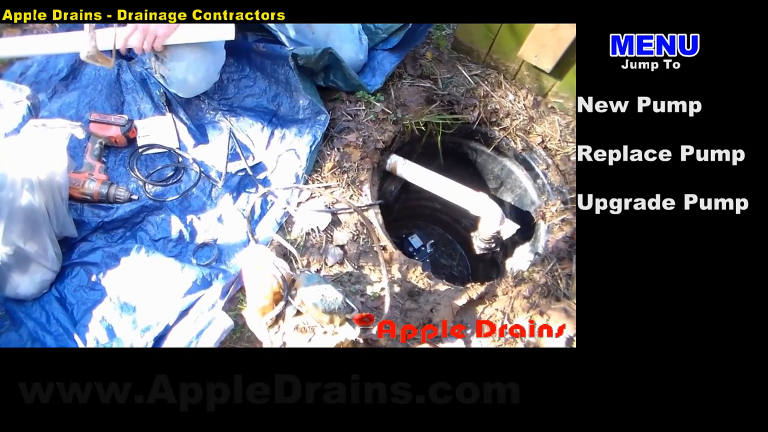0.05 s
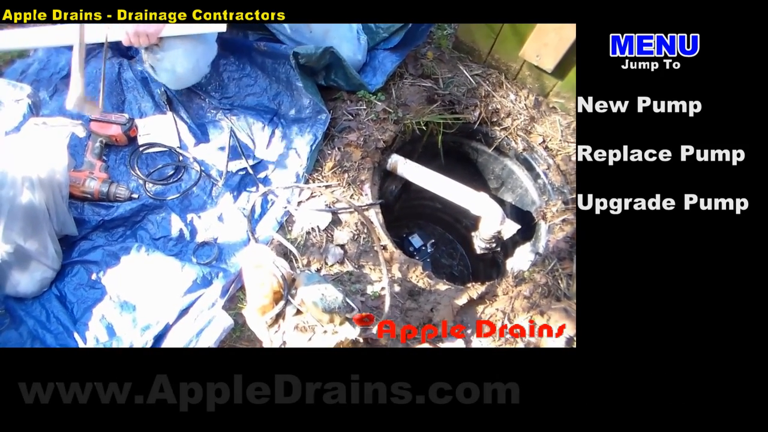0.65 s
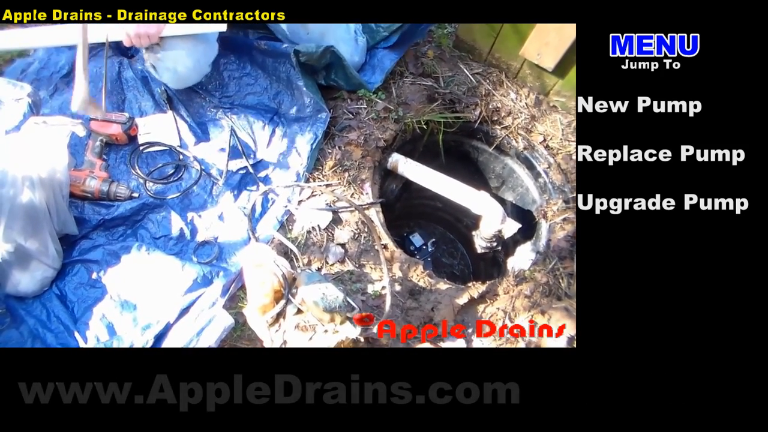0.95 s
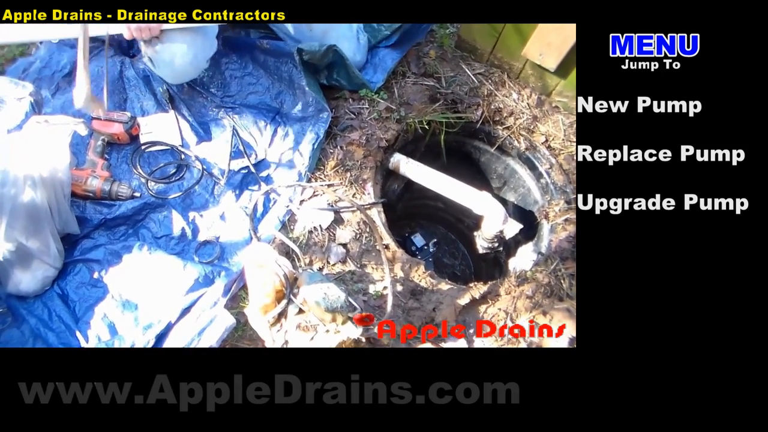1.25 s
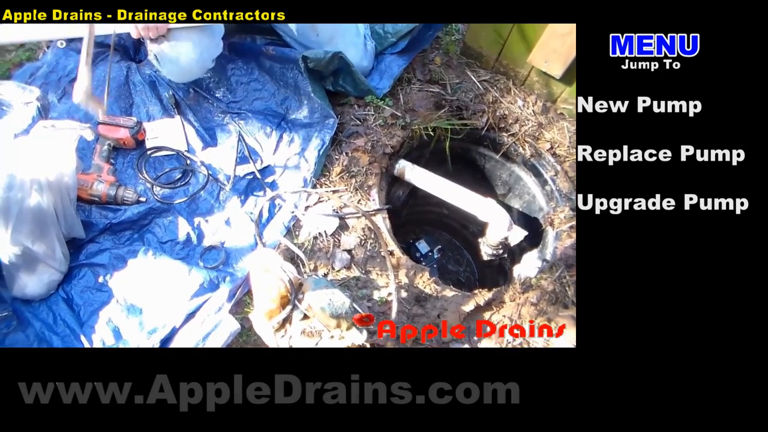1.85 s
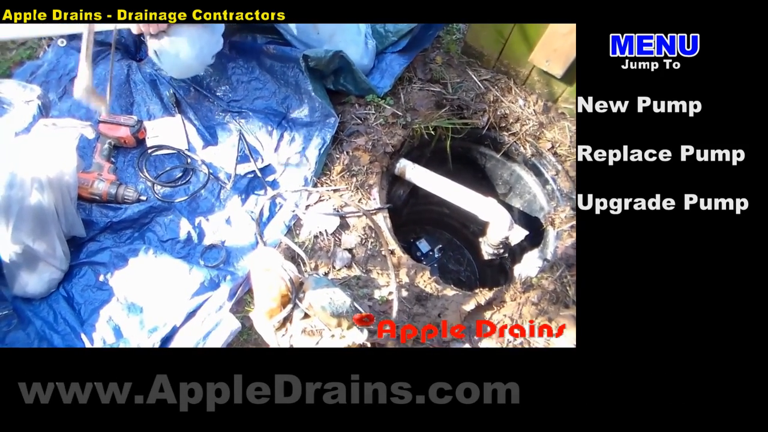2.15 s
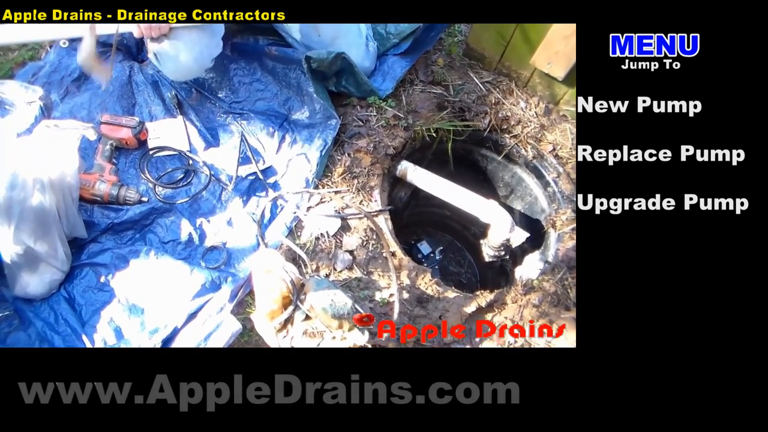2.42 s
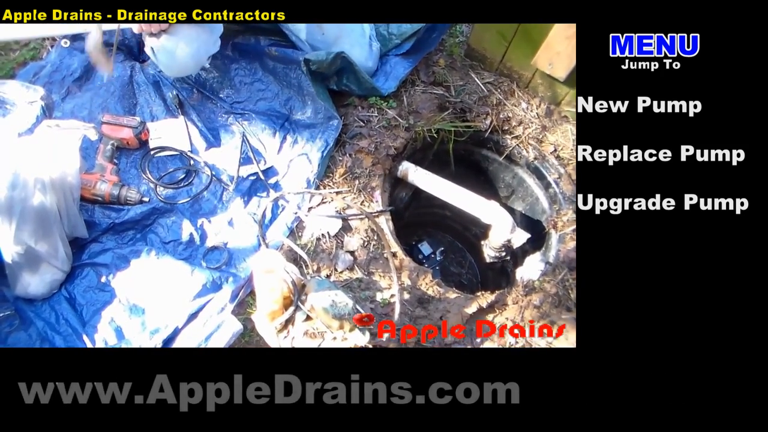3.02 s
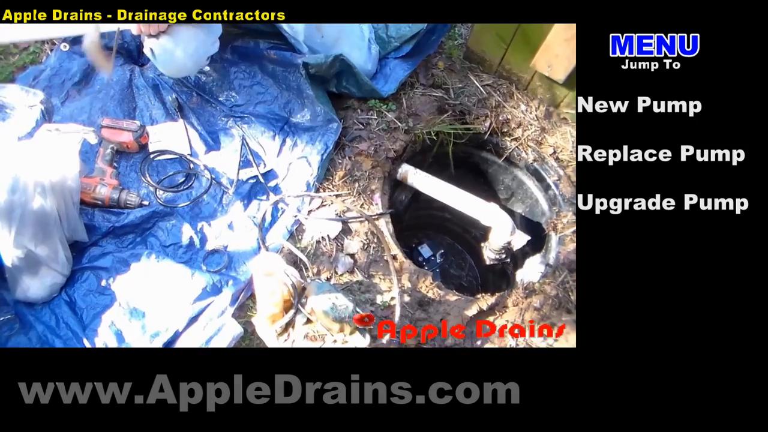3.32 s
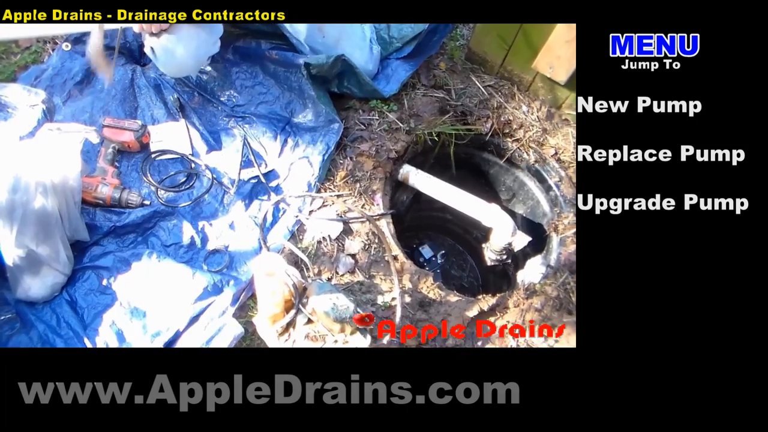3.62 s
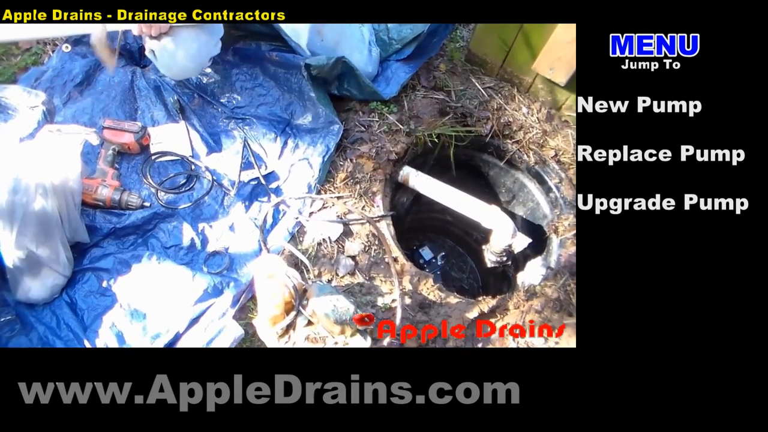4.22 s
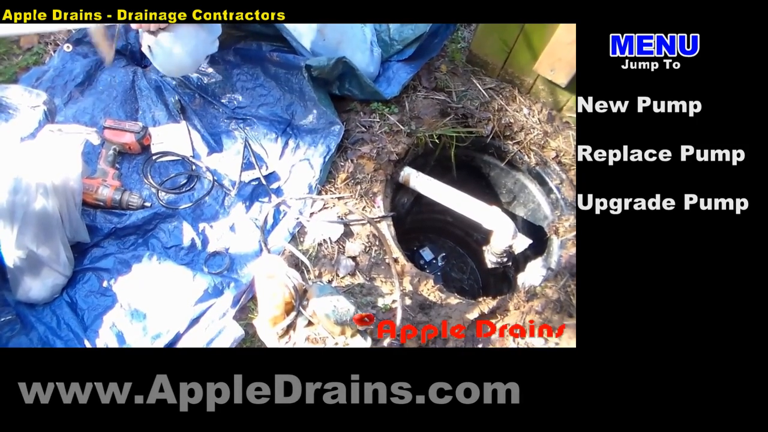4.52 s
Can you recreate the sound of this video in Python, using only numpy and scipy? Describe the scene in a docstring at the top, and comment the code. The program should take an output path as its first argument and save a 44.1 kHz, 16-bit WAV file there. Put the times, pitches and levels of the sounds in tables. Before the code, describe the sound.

A faint low rumble and thin hiss of an outdoor yard run throughout. In the first half second a plastic ground sheet rustles softly. At about 0.4 seconds a hacksaw blade skids across a plastic drain pipe and begins cutting, nearby and slightly to the right, at a little over three pushes a second. Each stroke is a gritty rasp with a short squeak that rises and falls in pitch, the pulls mostly weaker than the pushes. From 0.7 seconds the slack blade clicks sharply in its frame about once per cycle. The pipe knocks dully around 1.3 seconds. The early strokes are light; from about 2 seconds they become firmer and louder, with brief scrapes near 3 seconds. The rasp turns duller as the cut deepens. Another soft knock comes at 4.4 seconds, and the sawing continues to the end, near 4.8 seconds.

```python
"""Outdoors in a yard: a hacksaw cuts a plastic drain pipe, a little over three pushes a second.
Under a low rumble and thin hiss, a ground sheet rustles and the pipe knocks on its rest.
The blade skids on the cut wall and snaps in its frame as the arm turns round.
The tooth rate rises and falls with each stroke, so the pipe squeaks in arches over the rasp of chips."""
import sys
import numpy as np
from scipy import signal
from scipy.fft import rfft, irfft, next_fast_len
from scipy.io import wavfile
from scipy.ndimage import uniform_filter1d

SR = 44100
rng = np.random.default_rng(int(sys.argv[2]) if len(sys.argv) > 2 else 0)


def transcribe(signal):
    """Save signal, clipped to [-1, 1], as a 16-bit WAV file at the path in sys.argv[1]."""
    frames = np.atleast_2d(signal).T
    limited = np.clip(frames, -1, 1)
    pcm = np.round(limited * 32767).astype(np.int16)
    wavfile.write(sys.argv[1], SR, pcm)


N = 210397

# spectra of rumble, hiss, skid, snap and chips: (frequency [Hz], gain [dB])
RUMBLE_SPECTRUM = [(12, -20), (20, 3.5), (151, 1.5), (275, -10), (387, -14.5), (439, -5.5), (536, -7),
                   (608, -8.5), (715, -8), (755, -9.5), (1120, -21), (1500, -14.5), (1950, -24),
                   (3300, -120)]
HISS_SPECTRUM = [(200, -53), (500, -10), (1200, 5), (2500, -0.5), (6000, -8.5), (14000, -13), (16000, -98)]
SKID_SPECTRUM = [(400, -36), (1200, -8), (1700, -8), (2000, 1), (2250, -7), (2520, 6.5), (3000, -6),
                 (4000, -2.5), (9000, -36)]
SNAP_SPECTRUM = [(300, -20.5), (1500, -10), (3000, -1.5), (5000, 0), (8000, 4.5), (12000, 3), (14500, -7),
                 (16500, -25)]
CHIP_SPECTRUM = [(120, -20.5), (330, -17), (600, -8), (1200, 2.5), (2000, -0.5), (3200, -3), (4200, 0),
                 (6000, -1), (9000, -2), (12000, -4), (14200, -5.5), (16000, -108)]
# rumble envelope: (time [s], level [dB])
RUMBLE_LEVELS = [(0.0, -45.5), (0.65, -44.5), (0.74, -54.5), (1.13, -60.5), (1.23, -51), (2.47, -48),
                 (2.59, -47.5), (4.77, -48)]
# yard echo: (frequency [Hz], T60 [s])
YARD_DECAY = [(200, 0.044), (1500, 0.29), (3000, 0.39), (7000, 0.39), (14000, 0.26)]
# stereo width: (frequency [Hz], side gain [dB])
SIDE_SPECTRUM = [(100, 14), (700, -11), (1400, -12.5), (2800, -8.5), (4500, -4.5), (7000, 0.5), (14000, -3)]
# ground sheet rustles: (time [s], half width [s], level [dB])
RUSTLES = [(0.1, 0.1, -60), (0.237, 0.015, -55), (0.352, 0.0065, -55), (0.39, 0.068, -53.5)]
# pipe shifts on its rest: (time [s], level [dB])
KNOCKS = [(0.408, -56), (1.048, -43), (1.253, -36), (1.276, -33.5), (1.361, -36), (4.085, -49),
          (4.382, -31.5)]
# blade skids: (start [s], end [s], level [dB])
SKIDS = [(0.441, 0.593, -38), (0.636, 0.68, -55), (1.272, 1.33, -41.5), (2.839, 2.873, -37.5),
         (3.141, 3.165, -37)]
# blade snaps: (time [s], level [dB])
SNAPS = [(0.6866, -9.5), (0.9349, -11.5), (1.3184, -10.5), (1.5673, -7.5), (1.847, -8.5), (2.1268, -8),
         (2.421, -10), (3.045, -13), (3.0678, -16), (3.3337, -13), (3.6268, -13.5), (3.9323, -11),
         (4.2563, -12.5), (4.5401, -10.5)]
# blade and frame modes: (frequency [Hz], level [dB], T60 [s])
FRAME_MODES = [(2733, -7, .05), (3046, -5, .06), (4102, 0, .03), (4315, -4, .03), (4873, -1, .03),
               (5700, -4, .025), (6572, -1, .02), (6778, -3, .02), (7500, -1, .02), (8349, -3, .015),
               (9300, -3, .015), (11018, -3, .012)]
# pipe modes: (frequency [Hz], bandwidth [Hz], gain [dB])
PIPE_MODES = [(732, 89, -4), (917.5, 20, -21), (1336, 390, -9.5), (1498.6, 39, -5), (1646.4, 77, -8.5),
              (2220, 27, -7), (2640, 290, -3.5), (2884, 30, 5.5), (3020, 100, -5), (3370, 61, -8),
              (4440, 52, -7), (4730, 59, -1.5), (5650, 176, -3.5), (6250, 36, -39), (7550, 420, -15),
              (9050, 580, -3.5), (11860, 89, 2)]
# saw strokes: (start [s], length [s], top tooth rate [Hz], force [dB], entry catch [dB])
PUSHES = [(0.441, 0.17, 947, -38, -20), (0.783, 0.14, 1605, -53, 24.5), (1.095, 0.13, 1738, -56.5, 12),
          (1.382, 0.14, 1777, -40, 3), (1.686, 0.14, 1743, -37, 5), (1.98, 0.15, 1725, -33, 9),
          (2.283, .13, 1754, -31.5, 2), (2.586, 0.14, 1665, -30.5, 12.5), (2.889, 0.13, 1552, -29, 9.5),
          (3.192, .131, 1457, -29, 18), (3.494, .126, 1587, -29, 23.5), (3.787, 0.14, 1650, -33, 10.5),
          (4.097, 0.13, 1595, -31, 13.5), (4.405, 0.13, 1662, -30.5, 3), (4.708, 0.11, 1558, -30, -3.5)]
PULLS = [(0.629, 0.081, 1127, -47, 18), (0.921, 0.13, 1574, -60, 11), (1.226, 0.13, 1644, -50.5, 2),
         (1.534, 0.15, 1692, -52.5, 2), (1.852, .119, 1613, -45, 0.5), (2.15, 0.14, 1680, -46.5, 10),
         (2.452, 0.13, 1700, -36.5, 4), (2.75, 0.15, 1606, -43, 7.5), (3.059, 0.14, 1520, -41, 0.5),
         (3.357, 0.14, 1480, -41, 18), (3.652, 0.15, 1504, -45, 17.5), (3.959, 0.15, 1605, -45.5, 0),
         (4.254, 0.16, 1500, -49, 17.5), (4.556, 0.15, 1429, -52.5, 28)]
# rasp as the blade sinks in: (time [s], treble [dB], stroke start over end [dB])
CUT_DEPTH = [(0.498, 3, 5.5), (.9, 4.5, -7), (1.8, 2, 2.5), (2.6, -1, 10.5), (3.4, -3, 4), (4.6, -16, 2.5)]
# cut pinches the blade: (time [s], push rasp gain [dB], pull rasp gain [dB])
PINCH = [(.63, 0.5, -6), (.92, .5, -17), (1.22, 2.5, -8), (2.15, 0, -6), (2.75, 0.5, 1), (4.25, -4, 6)]
# overtones against the tooth note: (time [s], level [dB])
OVERTONE_LEVELS = [(.44, -13), (.7, 0.5), (1.7, -2.5), (2.0, -9.5), (2.7, -2.5), (3.4, -5.5), (3.8, 4),
                   (4.4, -3.5), (4.65, -17)]
# two bites per push in the groove: (delay [s], half width [s], note boost [dB], overtone boost [dB])
GROOVE_BITES = [(.05, 0.0093, 15.5, 5), (.082, .013, 13, 7)]
# catch on entry: (delay [s], half width [s], overtone share [ratio])
PUSH_CATCH, PULL_CATCH = (0.019, 0.018, 0.78), (0.037, 0.014, 0.064)

PUSH_FASTEST, PULL_FASTEST = .53, .49  # share of the stroke before top speed


def amp(db):
    """Decibels to gain."""
    return 10 ** (np.asarray(db) / 20)


def unit(x):
    """Scale to rms 1."""
    return x / np.sqrt(np.mean(x ** 2) + 1e-20)


def log_interp(points, hz):
    """Interpolate over log frequency."""
    f, value = np.transpose(points)
    return np.interp(np.log(hz + 1), np.log(f + 1), value)


def colour(x, spectrum):
    """Filter by a spectrum in dB."""
    size = next_fast_len(2 * x.shape[-1])
    gain = amp(log_interp(spectrum, np.fft.rfftfreq(size, 1 / SR)))
    return irfft(rfft(x, size) * gain, size)[..., :x.shape[-1]]


def wobble(hz):
    """Smooth, bounded random drift; rms 1, bandwidth about hz."""
    size = next_fast_len(N, real=True)
    lowpass = np.exp(-(np.fft.rfftfreq(size, 1 / SR) / hz) ** 2)
    drift = irfft(rfft(rng.standard_normal(size)) * lowpass, size)[:N]
    return unit(np.tanh(unit(drift) / 2))


def add(mix, start_s, sound):
    """Mix a sound in at start_s."""
    part = mix[max(round(start_s * SR), 0):][:len(sound)]
    part += sound[:len(part)]


def rumble_dips(threshold_db=-38.5, db_per_db=2.24, delay_s=0.03, fall_s=0.053, recover_s=0.18):
    """Rumble attenuation in dB: quickly down in each hard push, slowly back."""
    t, corners_s = np.arange(N) / SR, np.cumsum([delay_s, fall_s, recover_s])
    return sum(db_per_db * max(force_db - threshold_db, 0) * np.interp(t - start_s, corners_s, [0, 1, 0])
               for start_s, _, _, force_db, _ in PUSHES)


def outdoors(hiss_db=-60):
    """Lumpy low rumble and thin steady hiss."""
    mid, side = unit(colour(rng.standard_normal((2, N)), RUMBLE_SPECTRUM))
    side = colour(side, [(25, 3), (60, -33), (300, -8), (700, -15.5)])
    envelope_db = np.interp(np.arange(N) / SR, *np.transpose(RUMBLE_LEVELS))
    level = amp(envelope_db - rumble_dips() + 0.62 * wobble(29) - 2.15)
    hiss = unit(colour(rng.standard_normal((3, N)), HISS_SPECTRUM))
    return level * (mid + np.array([side, -side])) + amp(hiss_db) * (hiss[2] + .5 * hiss[:2])


def yard(mid, side, echo_db=-14):
    """Short echo off ground and fence; mid/side in, left/right out."""
    hz, t, bins = signal.stft(rng.standard_normal((2, SR // 2)), SR, nperseg=256)
    decay = amp(-60 * t / log_interp(YARD_DECAY, hz)[:, None])
    tail = signal.istft(bins * decay, SR, nperseg=256)[1]
    tail = np.pad(tail, ((0, 0), (200, 0)))  # pre-delay
    echo = amp(echo_db) * signal.fftconvolve(mid[None], tail / np.linalg.norm(tail[0]), axes=1)[:, :N]
    mid, side = mid + echo[0], colour(side + echo[1], SIDE_SPECTRUM)
    return np.array([mid + side, mid - side])


def scatter(x, decay_s=0.00073):
    """Nearby clutter smears sound arriving from the sides."""
    taps = rng.standard_normal(1024) * np.exp(-np.arange(1024) / SR / decay_s)
    return signal.fftconvolve(x, taps / np.linalg.norm(taps))[:N]


def sheet_rustle(grain_db=2.0):
    """Creases in the plastic sheet give way in clumps."""
    t = np.arange(N) / SR
    level = sum(amp(db) * np.exp(-((t - at_s) / half_s) ** 2) for at_s, half_s, db in RUSTLES)
    creases = rng.standard_normal((2, N)) * amp(grain_db * wobble(400))
    return level * unit(colour(creases, [(400, -17), (2000, 2.5), (4500, -1.5), (8000, -5.5), (14000, -14)]))


def pipe_knocks(decay_s=0.0083):
    """Dull bumps of the pipe on the ground sheet."""
    out, t = np.zeros(N), np.arange(2000) / SR
    for at_s, db in KNOCKS:
        burst = rng.standard_normal(len(t)) * np.exp(-t / decay_s)
        thud = colour(burst, [(60, -35), (200, 1), (700, 8), (2000, -2), (6000, -42)])
        add(out, at_s, amp(db) * thud / abs(thud).max())
    return out


def blade_skids(rough_db=4.0):
    """Hard, rough scrapes across the smooth wall."""
    level = np.zeros(N)
    for start_s, end_s, db in SKIDS:
        add(level, start_s, amp(db) * signal.windows.tukey(round((end_s - start_s) * SR), .15))
    friction = rng.standard_normal(N) * amp(rough_db * wobble(460))
    return level * unit(colour(friction, SKID_SPECTRUM))


def blade_snaps(crack_s=0.00053, rattle_s=0.0047, rattle_db=-12, ring_db=-23.5):
    """The slack blade slides onto its pin: crack, brief rattle, steel ring."""
    out, t = np.zeros(N), np.arange(3000) / SR
    rise = np.minimum(t / .0007, 1) ** 2
    envelope = rise * (np.exp(-t / crack_s) + amp(rattle_db) * np.exp(-t / rattle_s))
    for at_s, snap_db in SNAPS:
        tilt_db_per_oct = 0.85 - 0.665 * at_s  # duller as the cut grips the blade
        spectrum = [(hz, db + tilt_db_per_oct * np.log2(hz / 6000)) for hz, db in SNAP_SPECTRUM]
        crack = colour(rng.choice([-1, 1], len(t)) * envelope, spectrum)
        ring = sum(2 * rng.random() * amp(db - 60 * t / t60_s)
                   * np.sin(2 * np.pi * (hz * t + rng.random())) for hz, db, t60_s in FRAME_MODES)
        add(out, at_s, amp(snap_db - 2.0) * (crack + amp(ring_db) * rise * ring))
    return out


def pipe_wall(force, direct_db):
    """The wall answers a force at once, then rings in its modes."""
    t = np.arange(4096) / SR
    ring = sum(amp(db) * 2 * np.pi * width_hz / SR * np.exp(-np.pi * width_hz * t)
               * np.cos(2 * np.pi * hz * t) for hz, width_hz, db in PIPE_MODES)
    ring[0] += amp(direct_db)
    return signal.fftconvolve(force, ring)


def strokes(full_force_db=-30, full_rasp_db=-31.5, rasp_db_per_db=0.57):
    """Timing and tooth rate per stroke; force sets the rasp, note and overtone levels."""
    pinch_s, push_db, pull_db = np.transpose(PINCH)
    for table, fastest, pinch_db in (PUSHES, PUSH_FASTEST, push_db), (PULLS, PULL_FASTEST, pull_db):
        for start_s, length_s, top_hz, force_db, _ in table:
            rasp_db = full_rasp_db + rasp_db_per_db * (force_db - full_force_db)
            rasp_db += np.interp(start_s, pinch_s, pinch_db)
            overtone_db = force_db + np.interp(start_s, *np.transpose(OVERTONE_LEVELS))
            fastest_s, end_s = start_s + fastest * length_s, start_s + length_s
            yield start_s, fastest_s, end_s, top_hz, rasp_db, force_db, overtone_db


def blade_motion(start_s, fastest_s, end_s, top_hz, cling=0.6, lock_hz=100):
    """Samples, speed and tooth rate of a stroke; the rate clings to the low pipe modes."""
    span = np.arange(round(start_s * SR), min(round(end_s * SR), N))
    progress = np.interp(span / SR, [start_s, fastest_s, end_s], [0, .5, 1])
    speed = abs(np.sin(np.pi * progress)) ** .85
    free_hz = top_hz * speed
    shift_hz = sum((hz - free_hz) * np.exp(-((free_hz - hz) / lock_hz) ** 2) for hz, *_ in PIPE_MODES[:5])
    return span, speed, free_hz + cling * shift_hz


def bites(groove_formed_s=1.9, shallow_db=48, fade_db_per_s=16):
    """Note and overtone boosts in dB: each stroke catches on entry, then a push bites once or twice."""
    note_boost_db, overtone_boost_db, t = np.zeros(N), np.zeros(N), np.arange(SR // 5) / SR
    digs = []
    for table, (delay_s, half_s, share) in (PUSHES, PUSH_CATCH), (PULLS, PULL_CATCH):
        digs += [(start_s, (delay_s, half_s, db, share * db)) for start_s, *_, db in table]
    for start_s, length_s, *_ in PUSHES:
        # shallow cut: one bite at top speed, softer as the groove forms
        shallow = (PUSH_FASTEST * length_s + .0021, .22 * length_s,
                   shallow_db - fade_db_per_s * start_s, 5.5)
        digs += [(start_s, bite) for bite in ([shallow] if start_s < groove_formed_s else GROOVE_BITES)]
    for start_s, (delay_s, half_s, note_db, overtone_db) in digs:
        bump = np.exp(-((t - delay_s) / half_s) ** 2)
        add(note_boost_db, start_s, note_db * bump)
        add(overtone_boost_db, start_s, overtone_db * bump)
    return note_boost_db, overtone_boost_db


def chip_flicker(x, depth_db=3.5):
    """Each chip tears with its own ring: the colour keeps shifting."""
    bins = signal.stft(x, nperseg=512, noverlap=384)[2]
    field = uniform_filter1d(rng.standard_normal(bins.shape[-2:]), size=3, axis=0)
    field = unit(uniform_filter1d(field, size=6, axis=1))
    return signal.istft(bins * amp(depth_db * field), nperseg=512, noverlap=384)[1][..., :N]


def chip_rasp(clump_db=2.5, tooth_depth=0.24, repeat=0.23, bite_share=0.33, split_hz=4500):
    """Chips tear off in time with the teeth; returns mid and side."""
    out, blade_speed = np.zeros((2, N)), np.zeros(N)
    depth_s, treble_db, lean_db = np.transpose(CUT_DEPTH)
    chips = rng.standard_normal((2, N)) * amp(clump_db * wobble(45) + bite_share * bites()[1])
    for start_s, fastest_s, end_s, top_hz, rasp_db, _, _ in strokes():
        span, speed, tooth_hz = blade_motion(start_s, fastest_s, end_s, top_hz)
        # each tooth meets the same roughness as the one before
        earlier = np.round(span - SR / (tooth_hz + 200)).astype(int)
        pulsing = 1 + tooth_depth * np.cos(2 * np.pi * np.cumsum(tooth_hz) / SR)
        torn = (chips[:, span] + repeat * chips[:, earlier]) * pulsing
        lean = amp(np.interp(start_s, depth_s, lean_db) * np.linspace(.5, -.5, len(span)))
        out[:, span] += amp(rasp_db) * unit(torn * speed ** .5 * lean)
        blade_speed[span] = speed
    body = signal.sosfilt(signal.butter(1, split_hz, fs=SR, output="sos"), out)
    # faster teeth tear brighter
    treble_gain = amp(np.interp(np.arange(N) / SR, depth_s, treble_db) + 3.0) * blade_speed ** .6
    force = chip_flicker(colour(body + (out - body) * treble_gain, CHIP_SPECTRUM))
    return np.array([pipe_wall(row, direct_db=-1.5)[:N] for row in force])


def tooth_squeak(grab_db=1.5, fall_db_per_oct=8.5, flutter_db=5.0):
    """Teeth hammer the pipe; uneven blows make the note waver and each overtone flutter."""
    out, orders = np.zeros(N), np.arange(2, 9)[:, None]
    note_boost_db, overtone_boost_db = bites()
    waver, skip = .02 * wobble(90), .02 * wobble(1100)
    grab = amp(grab_db * wobble(90) + note_boost_db)
    flutter = np.array([wobble(79) for _ in orders])
    overtone_gain = amp(flutter_db * flutter + overtone_boost_db - fall_db_per_oct * np.log2(orders))
    for start_s, fastest_s, end_s, top_hz, _, note_db, overtone_db in strokes():
        span, speed, tooth_hz = blade_motion(start_s, fastest_s, end_s, top_hz)
        # a lightly pressed blade skips, a slow one judders
        looseness = amp(.65 * np.clip(-29 - note_db, 0, 18))
        judder = .7 + 4 * (1 - speed)
        jitter = judder * (waver[span] + looseness * skip[span])
        phase = 2 * np.pi * np.cumsum(tooth_hz * (1 + jitter)) / SR
        note = pipe_wall(speed ** 1.61 * grab[span] * np.sin(phase), direct_db=-69)
        blows = (overtone_gain[:, span] * np.cos(orders * phase)).sum(0) * speed ** 2.43
        overtones = pipe_wall(blows, direct_db=-7)
        squeak = amp(note_db) * unit(note) + amp(overtone_db) * unit(overtones)
        add(out, start_s, squeak * np.sqrt(len(note) / len(span)))
    return amp(-3.0) * out


def hacksaw():
    """All blade and pipe sound, as mid and side."""
    ringing = tooth_squeak() + blade_skids() + blade_snaps() + pipe_knocks()
    mid, side = chip_rasp()
    return ringing + mid, amp(-1.0) * scatter(ringing) + side


def scene():
    """Saw slightly right, over sheet and background."""
    return yard(*hacksaw()) * amp([[-.5], [.5]]) + sheet_rustle() + outdoors()


def record(dry, cutoff_hz=14500):
    """Low-pass band limit."""
    taps = signal.firwin(255, cutoff_hz, window=("kaiser", 8), fs=SR)
    return signal.oaconvolve(dry, taps[None], "same")


dry = scene()
out = record(dry)
transcribe(out)
```